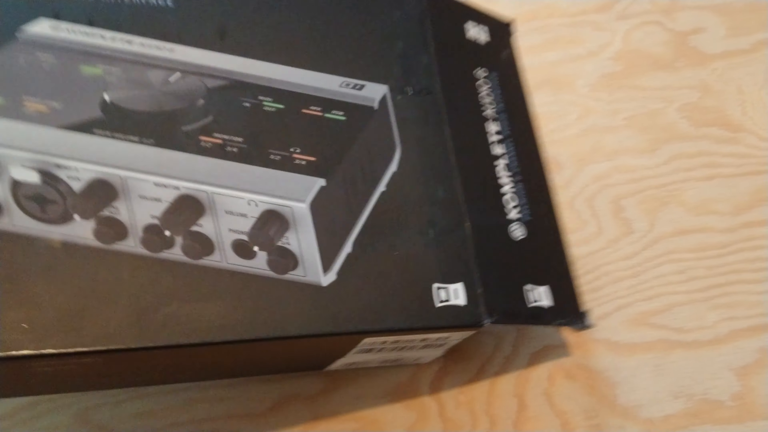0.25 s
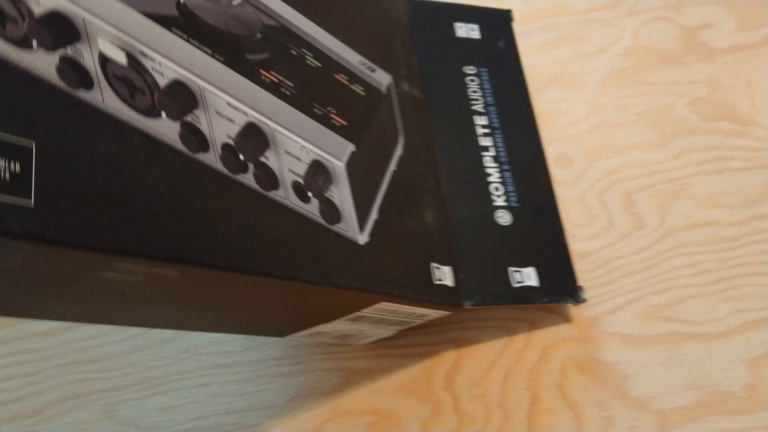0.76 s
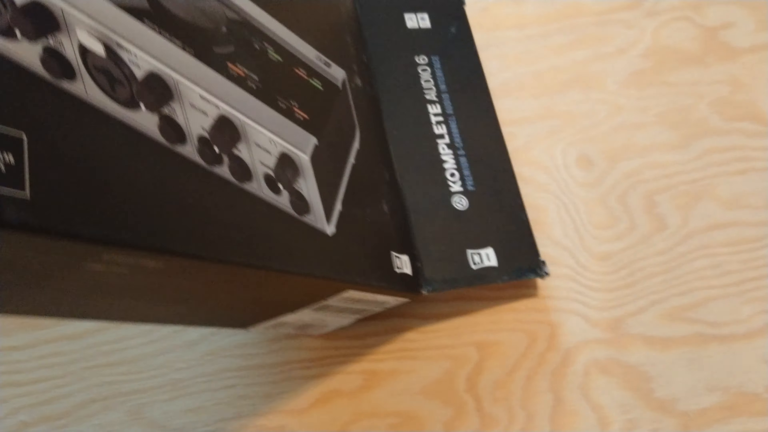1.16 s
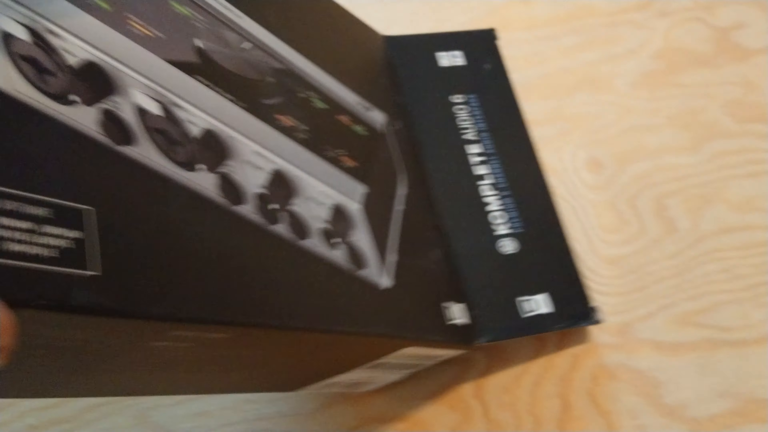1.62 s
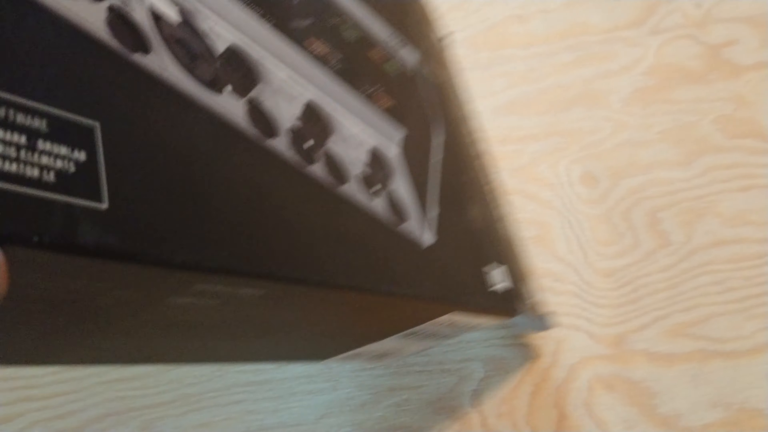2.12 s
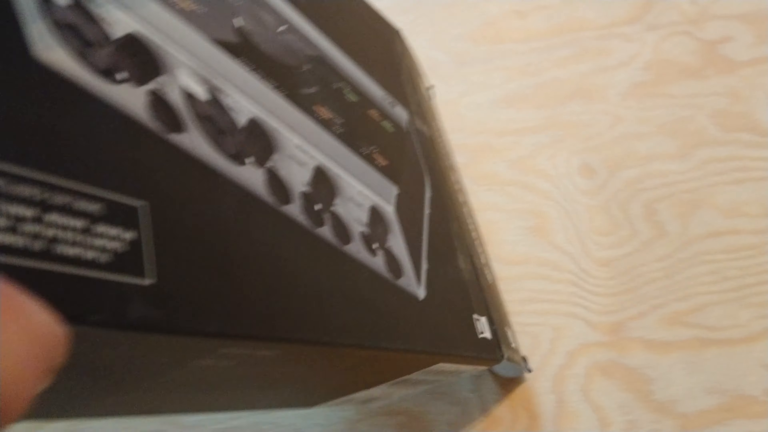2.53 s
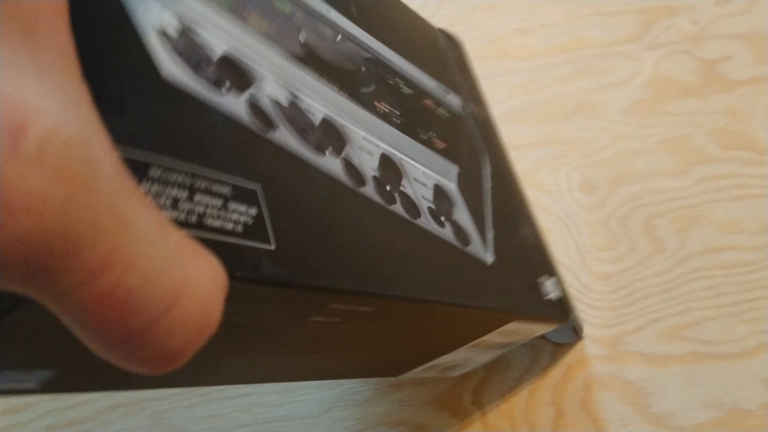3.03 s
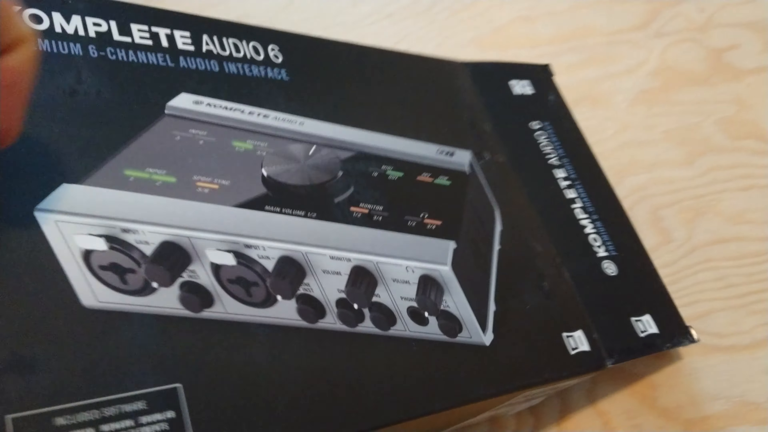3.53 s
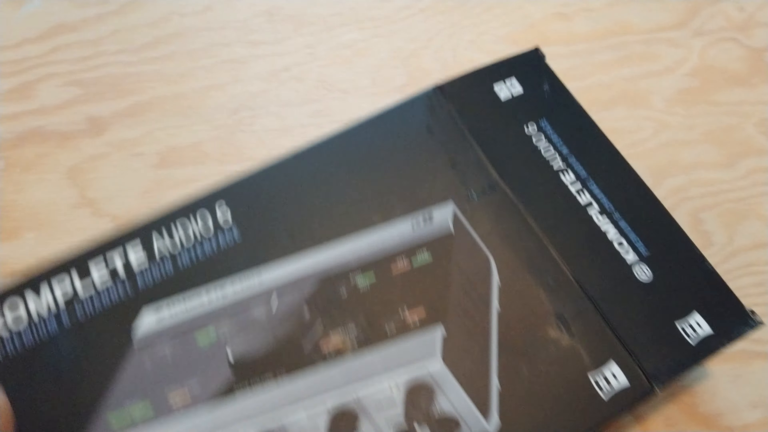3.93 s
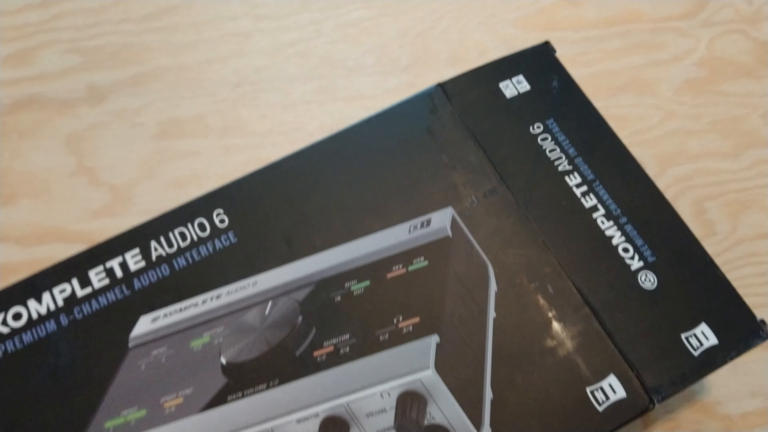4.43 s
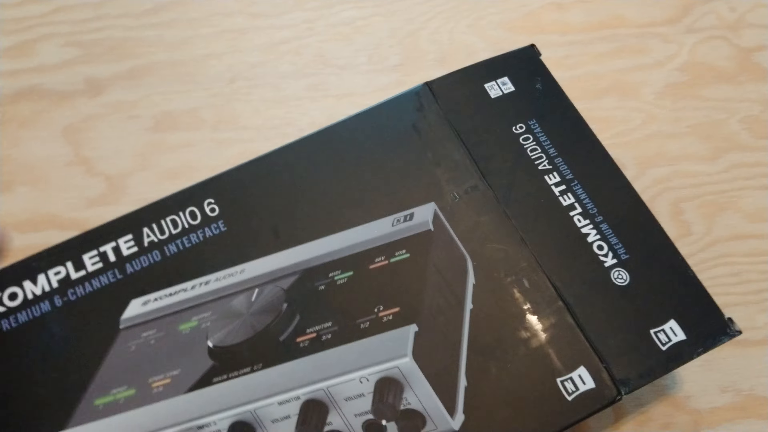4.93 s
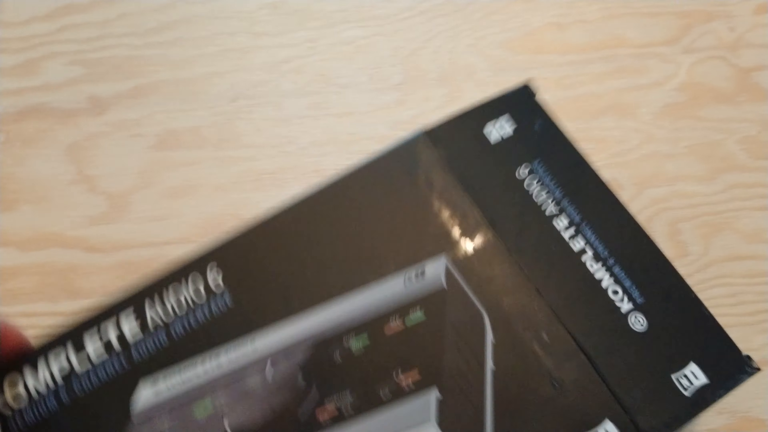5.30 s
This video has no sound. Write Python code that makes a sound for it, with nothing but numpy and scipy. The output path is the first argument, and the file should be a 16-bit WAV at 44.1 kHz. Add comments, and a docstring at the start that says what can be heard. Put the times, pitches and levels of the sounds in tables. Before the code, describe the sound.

A close recording of a cardboard box handled on a table in a small, short-sounding quiet room with faint steady noise. From about 0.1 s a tray scrapes inside its sleeve, hollow and raspy, with dense snapping catches around 0.3-0.4 s. Weaker rubs and a bright crack follow at 0.6-0.7 s, then another crackly cluster at 0.85-1.0 s. Short scrapes continue, with box bumps near 1.2 and 1.75 s and a strong drag until about 2 s. It then falls nearly silent, with only small rubs around 2.3-2.5 s and faint ticks. Scraping and snapping return at 3.0-3.2 s and 3.35-3.6 s. A light, smooth card-on-card slide swells near 3.8 s, a hollow knock lands at 4.0 s, and soft hisses and small bumps continue to 4.9 s. A brisker rub rises at 5.3 s into the loudest, hollow, woody thump at 5.4 s, followed by small rebounds and a papery trailing rustle.

```python
"""Close to the microphone, a tray scrapes out of a cardboard sleeve in jerks, its edges catching and snapping;
then a hand slides over the card with a smooth hiss, and the box bumps a few times, hardest near the end. The
place is a table in a small quiet room with a faint steady noise. Rubbing is noise shaped by tiny slips and by
the resonances of hollow, panels and fibres; catches are runs of tears, snaps are clicks, bumps are damped
modes."""
import sys
import numpy as np
from scipy import signal
from scipy.fft import rfft, irfft, next_fast_len
from scipy.io import wavfile
from scipy.ndimage import uniform_filter1d, map_coordinates

SR = 44100
rng = np.random.default_rng(int(sys.argv[2]) if len(sys.argv) > 2 else 0)


def wrap_up_sound(samples):
    """Save the sound to the file named by the first command line argument, as 16-bit audio."""
    columns = np.atleast_2d(samples).T
    # keep every value between -1 and 1, then stretch to whole-number steps
    tamed = np.clip(columns, -1, 1)
    steps = np.round(tamed * 32767).astype(np.int16)
    wavfile.write(sys.argv[1], SR, steps)


N = 245195

# Level columns are relative: the functions that use them may add a common offset.
# Half-widths are taken where a resonance has fallen by 6 dB.

# Steady noise of the room: [f/Hz, density/dB per Hz]
AIR_SPECTRUM = [(25, -19), (45, -22.5), (70, 1.5), (108, -0.5), (170, -1), (249, -7), (363, -14.5),
                (863, -10.5), (1840, -15.5), (2910, -16.5), (6920, -29.5), (7710, -27), (16000, -32)]
# Dying away of the room: [f/Hz, t60/s]
ROOM_DECAY = [(150, 0.42), (500, 0.16), (2000, 0.25), (6000, 0.17), (15000, 0.14)]
# Two microphone ports, before each side's weight: [f/Hz, likeness 0-1, left lead/rad, left minus right/dB]
PORTS = [(90, 0.34, 0.84, -11), (396, 0.74, 0, -1.5), (664, 0.99, 1.36, -5.5), (1200, 0.2, 1.77, -11.5),
         (2110, 0, 3, -17), (2940, 0, 6, -5.5), (7200, 0, 6, -14), (14300, 0, -4.5, -15.5)]
# Slow change of balance between left and right, for the box and its room answer: [t/s, left minus right/dB]
SWAY = [(.15, -0.5), (.45, 0), (.6, 0.5), (1.05, 1), (1.5, 0), (2.0, 1), (2.4, -1), (2.96, 0), (3.15, 1),
        (3.45, 1), (3.75, -0.5), (4.4, 1), (4.88, 1), (5.1, -1.5), (5.4, 1)]
# Hands shifting their grip and flexing the box: [t/s, half length/s, rumble level/dB]
GRIPS = [(0.398, .02, -54.5), (0.666, 0.04, -55), (1.94, 0.018, -48.5), (2.73, 0.016, -56.5),
         (3.09, 0.051, -53.5), (3.535, 0.059, -53), (4.02, 0.021, -57.5), (4.545, 0.031, -60.5),
         (4.776, .025, -66.5), (5.488, 0.03, -54.5)]

# Air and broad walls of the box: [f/Hz, half-width/Hz, level/dB]
HOLLOW = [(227, 11, -7.5), (292.6, 68, -6.5), (389.5, 43, 2), (495, 68, -1), (608, 12, 0), (774, 41, -14.5)]
# Bending of the stiff panels: [f/Hz, half-width/Hz, level/dB]
PANELS = [(840, 270, -1), (955, 120, 0), (1244, 128, 7), (1460, 150, 1.5), (1680, 120, 2), (1806, 118, 2),
          (2160, 218, 1), (2300, 120, -17.5)]
# Hollow under a light glide: [f/Hz, half-width/Hz, level/dB]
MURMUR = [(242, 48, -6), (422, 81, 0), (470, 67, 4), (606, 136, -1), (805, 250, -19.5)]
# Finest hiss: [f/Hz, half-width/Hz, level/dB]
SHEEN = [(7750, 2200, 12), (12840, 1000, 15.5), (14890, 630, 11)]
# Paper fibres torn across: [f/Hz, density/dB per Hz]
TORN_FIBRES = [(1500, -17), (2350, -15), (2800, 0.5), (3450, 0), (4000, 5), (4900, -0.5), (5550, 0),
               (6150, -8), (6880, -1.5), (7850, -17.5), (8600, -4.5), (9900, -19), (12800, -18),
               (16000, -19)]
# Paper fibres brushed along: [f/Hz, density/dB per Hz]
BRUSHED_FIBRES = [(1500, -4), (2400, 3.5), (3200, -4), (4500, 2), (5300, -0.5), (6100, -2.5), (6900, 1.5),
                  (7800, -15.5), (8800, -6.5), (10500, -18), (12800, -15), (14500, -24), (16000, -11.5)]
# Glossy coating: [f/Hz, density/dB per Hz]
COATING = [(5000, 0), (8700, 1.5), (11000, -10.5), (15500, -2)]
# Other walls, which join in every bump: [f/Hz, level/dB, t60/s]
WALLS = [(310, -28.5, 0.026), (402, -29, 0.22), (511, -13, 0.031), (645, -9, 0.019), (1310, -34, 0.0087),
         (1338, -30, 0.01)]
# Base rocking on the table: [f/Hz, level/dB, t60/s]
BASE = [(95, -11, 0.025), (148, 17, 0.067), (169.5, -6.5, 0.48)]

# Light passes of a hand over the card: [t at full speed/s, hold/s, attack/s, release/s, level/dB, fade over the
# hold/dB, hollow relative level/dB, fibre relative level/dB, sheen relative level/dB]
PASSES = [(3.72, 0.054, 0.62, 0.064, -50.5, -3, -2, -7, -10),
          (3.806, 0.018, 0.02, 0.074, -41, 5.5, -0.5, -1, -8),
          (3.93, 0.098, 0.77, 0.014, -60.5, -7, -5.5, 4.5, -1),
          (4.11, 0.12, 0.17, 0.031, -58.5, 0.5, -0.5, -2, -7),
          (4.31, 0.086, 0.16, 0.08, -54.5, 2.5, 6, -0.5, -3.5),
          (4.445, 0.015, 0.043, 0.009, -53, 0.5, -5, 1.5, -7),
          (4.45, 0.081, 0.57, 0.12, -64, 4.5, -8, 6.5, 11.5),
          (4.54, 0.11, 0.063, 0.16, -60.5, 0.5, 3, 1.5, -1.5),
          (4.76, 0.047, 0.089, 0.042, -57.5, 0, 12, 7.5, 4.5),
          (4.86, 0.089, 0.33, 0.072, -70.5, 2, 8.5, 12, 19.5),
          (5.08, 0.22, 0.19, .08, -61, -9, -0.5, 1.5, -8.5),
          (5.27, 0.13, 0.11, 0.078, -45.5, 7, 1.5, 2, -1.5),
          (5.492, 0.019, 0.034, 0.027, -52.5, 3.5, 2.5, 1.5, 0),
          (5.548, .02, 0.024, .05, -58, -3, 3, -1, -7)]
# The coating cracks at a fold: [t/s, level/dB]
CRACKS = [(0.623, -33), (0.6849, -24), (2.317, -53), (3.04, -37), (3.099, -29.5), (3.155, -48),
          (3.803, -45), (4.15, -47)]
# The box bumps as a whole: [t/s, level/dB, struck wall f/Hz, its t60/s,
# base relative level/dB, crack relative level/dB]
BUMPS = [(0.399, -32.5, 417, 0.012, -0.5, -27), (1.175, -24.5, 512, 0.041, -42, -8),
         (1.7495, -21.5, 497.6, 0.15, -34, -1), (2.384, -47.5, 416, 0.025, -5.5, -17),
         (3.374, -30, 415, 0.011, -11, -8), (4.0121, -23.5, 419, 0.021, -11.5, -9.5),
         (4.151, -33, 410, 0.015, -11, -17), (4.621, -30.5, 460, 0.012, -15, -15),
         (4.79, -39, 443, 0.094, -20, -26), (5.366, -31, 696, 0.014, -12, -2),
         (5.398, -19.5, 437, 0.054, -6, -5), (5.4025, -6.5, 459, 0.026, -10, -7.5),
         (5.4455, -29, 460, 0.041, -16, -17)]
# One wall takes up the rubbing for a moment: [t/s, half length/s, f/Hz, level/dB]
GROANS = [(0.338, 0.038, 635, -31.5), (0.365, 0.024, 294, -36.5), (0.877, 0.022, 430, -36.5),
          (1.77, 0.031, 474, -39), (2.427, 0.013, 5100, -58), (3.429, 0.013, 2090, -42),
          (3.431, 0.013, 5200, -54), (4.336, 0.028, 2350, -53), (4.57, 0.028, 1770, -57),
          (4.795, 0.0082, 441, -38.5), (5.28, .045, 610, -46.5)]
# An edge catches and lets go: [t/s, hollow level/dB, panel level/dB, fibre level/dB,
# plucked panel f/Hz, t60 of the tears/s]
CATCHES = [(0.169, -43.5, -56, -51.5, 1240, .025), (0.278, -31, -40.5, -46, 1370, 0.014),
           (0.293, -35, -34, -42, 1900, 0.047), (0.306, -33, -33, -38, 1890, 0.013),
           (0.3295, -42, -29.5, -36, 1890, 0.085), (0.347, -26.5, -40, -40, 915, 0.02),
           (0.366, -32, -35.5, -44, 1910, 0.012), (0.399, -38, -36.5, -43, 1010, 0.082),
           (0.413, -43, -48, -45.5, 1120, 0.0082), (0.53, -35, -45, -51, 1200, 0.2),
           (0.624, -35.5, -41.5, -48, 1180, 0.031), (0.6828, -41, -33.5, -44, 1540, 0.0085),
           (0.716, -44, -51, -60, 1200, .02), (0.8431, -64, -32, -37.5, 1590, 0.0079),
           (0.862, -39, -38, -39.5, 1320, 0.03), (0.876, -40, -44, -49, 1100, 0.016),
           (0.892, -38, -32, -44, 1440, 0.03), (0.899, -33, -38, -52, 1270, 0.026),
           (0.924, -40, -37, -48, 1740, .014), (0.928, -31, -35, -50, 1390, 0.035),
           (0.946, -34, -33, -35.5, 1600, 0.043), (0.955, -30.5, -39, -54, 1250, 0.016),
           (0.9762, -46, -31.5, -34, 1450, 0.051), (1.001, -52, -50, -37.5, 1500, 0.032),
           (1.031, -71, -50, -50, 1390, 0.017), (1.133, -46.5, -56, -57, 1100, 0.032),
           (1.175, -43, -35, -41.5, 1510, 0.0355), (1.212, -65, -35.5, -65, 1300, 0.046),
           (1.229, -48, -38.5, -47, 1270, 0.044), (1.267, -43, -48, -49, 1180, 0.028),
           (1.362, -73, -38, -40.5, 1500, 0.078), (1.573, -52, -42.5, -59, 1230, .035),
           (1.587, -49, -40, -58, 1460, 0.014), (1.6, -38, -39, -48.5, 1200, 0.016),
           (1.615, -56, -43, -47, 1390, .015), (1.7498, -62, -32, -49, 1360, 0.045),
           (1.794, -44, -34.5, -38, 1390, 0.04), (1.8814, -34.5, -36.5, -59, 1380, 0.02),
           (1.895, -36, -40.5, -63, 1400, 0.013), (1.917, -35.5, -34, -55, 1430, 0.032),
           (1.931, -38, -49, -49, 1660, 0.015), (1.98, -59, -53.5, -55, 1500, 0.01),
           (2.325, -56, -54, -67, 1170, 0.054), (2.343, -61, -59.5, -70, 900, 0.016),
           (2.4155, -70, -61, -52.5, 1880, .015), (2.498, -60, -58, -82, 754, 0.031),
           (2.683, -54.5, -57, -72, 1390, 0.029), (2.713, -55, -56, -61, 1260, 0.021),
           (2.749, -52, -50, -78, 847, 0.024), (2.792, -60, -58, -75, 770, 0.034),
           (2.961, -47.5, -43, -62.5, 1200, 0.052), (2.9926, -39, -46.5, -57, 923, 0.024),
           (3.034, -45, -47, -69, 1500, .015), (3.04, -34, -37, -49, 855, 0.025),
           (3.051, -48, -40.5, -64, 1120, 0.02), (3.0808, -41, -38.5, -54, 1280, 0.073),
           (3.0947, -36, -32.5, -47, 910, 0.02), (3.103, -58, -39.5, -37.5, 1620, 0.052),
           (3.155, -39, -35.5, -43.5, 1350, 0.037), (3.349, -54, -41.5, -52, 1910, 0.027),
           (3.3615, -43, -44, -52, 1120, 0.0097), (3.368, -40, -46, -54, 945, 0.017),
           (3.407, -44.5, -36, -61, 1520, 0.022), (3.417, -46, -43, -65, 1850, 0.012),
           (3.423, -43, -38, -66, 1550, 0.017), (3.438, -44, -46, -58, 1900, 0.017),
           (3.444, -37, -34, -51, 1880, 0.018), (3.47, -46, -41.5, -58, 1410, 0.014),
           (3.483, -41.5, -40.5, -65, 1090, 0.013), (3.492, -40, -45, -72, 1340, 0.0072),
           (3.505, -44, -42, -49.5, 1310, 0.012), (3.55, -48, -45.5, -72, 790, 0.0071),
           (3.564, -40.5, -52, -65, 1160, 0.02), (3.584, -39, -44, -67, 830, 0.018),
           (3.803, -41.5, -51, -42, 1210, 0.026), (4.149, -37, -44, -53, 860, 0.018),
           (4.158, -46, -51, -53, 1320, 0.015), (4.583, -53, -52, -58.5, 1980, 0.02),
           (4.876, -51.5, -63, -66, 900, .02), (5.001, -60, -58, -78, 1780, 0.01),
           (5.133, -67, -52.5, -61, 1300, 0.017), (5.3991, -41, -32.5, -36.5, 1920, 0.0094),
           (5.405, -42, -30, -38.5, 920, 0.0059), (5.4448, -33.5, -41, -59, 1090, 0.016),
           (5.48, -45, -50, -59, 1490, 0.016), (5.515, -48, -53.5, -73, 1190, 0.018)]
# Pulls of the tray in its sleeve: [t at full speed/s, hold/s, attack/s, release/s, level/dB,
# fade over the hold/dB, hollow relative level/dB, fibre relative level/dB, spread of slip sizes/dB,
# sheen over the fibres/dB, panel pitch/semitones]
PULLS = [(.185, 0.13, 0.065, 0.083, -38, 4.5, 2.5, -13, 2.5, 0.5, -2.5),
         (.3, 0.034, 0.12, 0.13, -35, 0.5, 13.5, -6, 5, -5, -1.95),
         (.535, 0.04, 0.025, 0.21, -47, 5, 1, -11.5, 3, -7, 0.62),
         (.668, 0.044, 0.048, 0.13, -42.5, 2, 10, -2.5, -1.5, -4.5, -2.7),
         (.78, 0.034, 0.049, 0.036, -47, 2, 7, -9, 2, -6, -1.3),
         (.85, 0.16, 0.016, 0.14, -46, -5.5, 2, -4, 2, -9, 2.1),
         (1.215, 0.032, 0.06, 0.066, -42.5, 3, 2, -0.5, 2, -22, -0.82),
         (1.372, 0.081, 0.052, 0.057, -43.5, 1.5, -13, -3, 0.5, -13, 1.6),
         (1.525, 0.023, 0.39, 0.05, -48.5, 1, 6, -8, -3, -11, -0.57),
         (1.585, 0.034, 0.058, 0.059, -40, 4.5, 4.5, -5, 1, -17, 0.27),
         (1.7, 0.022, 0.029, .04, -45.5, -1, 7.5, -7.5, 4, -7, -1.4),
         (1.765, 0.2, 0.052, 0.035, -38, 4, 1, -6, -3, -15, -0.44),
         (2.02, 0.029, .03, 0.086, -64.5, 9, 4, -6, -2, -14, 1.8),
         (2.2, 0.05, 0.02, .02, -73.5, 8.5, -2, -16, 6, -15.5, 0.85),
         (2.327, 0.02, 0.0027, 0.067, -52.5, 4, -19, -3, -0.5, -6, 0.96),
         (2.414, 0.065, 0.025, 0.075, -50, 11.5, -4.5, -1.5, 0.5, -3.5, 1.1),
         (2.59, 0.012, 0.029, 0.025, -69.5, 3.5, -2, -9, -1.5, -13, -0.31),
         (2.71, 0.11, 0.075, 0.056, -60, 8, 1.5, -8, 2, -13, -2.7),
         (3.04, 0.18, 0.1, 0.062, -51.5, 2.5, 3.5, -11, 13, -1, 0.89),
         (3.21, 0.15, 0.16, 0.052, -51.5, -3, -4.5, -6.5, -1, -6.5, -0.67),
         (3.355, 0.021, 0.04, 0.062, -41.5, 4, 8.5, -9.5, 7, -10, -0.029),
         (3.415, 0.028, 0.0092, 0.039, -45.5, 2, 3.5, -8, 7, -14, 1.9),
         (3.48, 0.11, 0.052, 0.049, -51, -3, 7.5, -11.5, 3.5, -27, 0.012)]

REBOUND_S, SHRINK = 0.039, 0.53  # first rebound after a bump, each flight over the one before
REBOUND_DB, LOSS_DB = -22.5, 13  # first rebound, loss for each further one
REBOUND_T60_S, REBOUND_CRACK_DB = 0.035, -19
CLUMP_RATE_HZ, CLUMP_LIFE_S, CLUMP_SPREAD_DB, CLUMP_STEADY = 110, 0.004, 4, 0.5
SNAP_CYCLES = 5.5  # cycles in which a snap loses 60 dB
TOP_HZ = 16100


def amp(db):
    """Decibels to gain."""
    return 10 ** (np.asarray(db) / 20)


def unit(x):
    """Scaled to rms 1."""
    return x / np.sqrt(np.mean(x ** 2) + 1e-20)


def along(points, hz, axis=1):
    """One column of a table by frequency, read on a log axis."""
    cols = np.transpose(points)
    return np.interp(np.log(hz + 1), np.log(cols[0] + 1), cols[axis])


def curves(rows):
    """One value per sample for each column after the time."""
    s, *cols = np.transpose(rows)
    return [np.interp(np.arange(N) / SR, s, c) for c in cols]


def filtered(x, response):
    """The signal shaped by a complex response of frequency, padded against wrap-around."""
    n = x.shape[-1]
    padded = 2 * next_fast_len(n)
    spectrum = rfft(x, padded) * response(np.fft.rfftfreq(padded, 1 / SR))
    return irfft(spectrum, padded)[..., :n]


def causal(gain):
    """The minimum-phase response with this gain, which rings only after a blow."""
    cepstrum = irfft(np.log(np.maximum(gain, 1e-6)))
    half = len(cepstrum) // 2
    return np.exp(rfft(np.r_[cepstrum[0], 2 * cepstrum[1:half], np.zeros(half)]))


def resonant(modes):
    """Response of a set of broad resonances with steep skirts."""
    def peak(hz, centre, width, db):
        detuning = (hz * hz - centre * centre) / (2 * width * hz + 1)
        return amp(db) ** 2 / (1 + detuning ** 2) ** 2
    return lambda hz: causal(np.sqrt(sum(peak(hz, *mode) for mode in modes)))


def coloured(spectrum):
    """Response of a smooth spectrum, rolled off below its first point."""
    return lambda hz: causal(amp(along(spectrum, hz)) * np.minimum(hz / spectrum[0][0], 1) ** 2)


def dying(t, t60):
    """A decay that loses 60 dB in t60."""
    return np.exp(-np.log(1000) * t / max(t60, 1e-4))


def add(track, s, sound):
    """Mix a sound in at time s."""
    part = track[:, max(round(s * SR), 0):][:, :sound.shape[-1]]
    part += sound[..., :part.shape[1]]


def drift(rate):
    """A smooth random curve, rate knots a second."""
    return map_coordinates(rng.standard_normal(200), [np.arange(N) * rate / SR], mode="wrap")


def strokes(rows):
    """Strokes swell 20 dB in the attack, fade, lose 20 dB in the release; colours are weighted by power."""
    t = np.arange(0, N, SR // 1000) / SR
    s, hold, attack, release, db, fade_db, *colours = np.transpose(rows)[..., None]
    before = np.maximum(s - t, 0) / np.abs(attack)
    after = np.maximum(t - s - hold, 0) / np.abs(release)
    fade = fade_db * np.clip((t - s) / hold, 0, 1)
    power = amp(db - 20 * (before + after) - fade) ** 2 + 1e-14
    total = power.sum(axis=0)
    mixed = [(power * c).sum(axis=0) / total for c in colours]
    return curves(np.transpose([t, 10 * np.log10(total), *mixed]))


def slips(spread_db, rate, life, steady):
    """Stick-slip force: random tiny releases of uneven size over a steady drag, local mean power near 1."""
    release = rng.random(N) < rate / SR
    size = release * amp(spread_db * np.clip(rng.standard_normal(N), -2, 2))
    power = signal.lfilter([1], [1, -np.exp(-1 / (life * SR))], size ** 2)
    power = power / (np.abs(uniform_filter1d(power, size=2200)) + 1e-6)  # evened over 50 ms
    return np.sqrt((np.abs(power) + abs(steady)) / (1 + abs(steady)))


def rubbed(force, response, level_db):
    """Friction noise under a slip force, ringing in one part of the box."""
    def balanced(hz):
        gain = response(hz)
        return gain / np.sqrt(np.mean(np.abs(gain) ** 2))
    noise = unit(force * rng.standard_normal((2, N)))
    return filtered(noise * amp(level_db), balanced)


def wandering(x, depth_db):
    """As the contact moves, it favours ever different modes of the card."""
    z = signal.stft(x, nperseg=512)[2]
    field = uniform_filter1d(rng.standard_normal(z.shape[1:]), size=3, axis=0)
    field = uniform_filter1d(field, size=18, axis=1)  # about 0.1 s
    return signal.istft(z * unit(amp(depth_db * unit(field))), nperseg=512)[1][:, :N]


def flexing(force, level_db, semitones, reach=2.4):
    """The panels ring higher or lower as the grip tightens and slackens, within reach semitones."""
    place = np.clip(semitones / reach, -1, 1)
    sound = 0
    for step in (-1, 0, 1):  # crossfade lowered, resting and raised panels
        share = np.maximum(1 - np.abs(place - step), 1e-6)
        modes = [(hz * 2 ** (step * reach / 12), width, db) for hz, width, db in PANELS]
        sound = sound + rubbed(force, resonant(modes), level_db + 10 * np.log10(share))
    return sound


def ringing(modes, t, swell):
    """Damped modes under a soft push, peak 1."""
    ring = sum(amp(db + rng.normal(0, 1)) * np.sin(2 * np.pi * hz * t) * dying(t, t60)
               for hz, db, t60 in modes)
    ring = ring * (1 - np.exp(-(t / swell) ** 2))
    return ring / np.abs(ring).max()


def room_noise():
    """Steady noise with the spectrum of the quiet room, rms 1."""
    return unit(filtered(rng.standard_normal((2, N)), coloured(AIR_SPECTRUM)))


def room(x):
    """A short diffuse answer of the walls, each frequency dying at its own speed."""
    hz, t, z = signal.stft(rng.standard_normal((2, SR // 2)), SR, nperseg=256)
    decay = np.exp(-np.log(1000) * t / along(ROOM_DECAY, hz)[:, None])
    tail = signal.istft(z * decay, SR, nperseg=256)[1]
    late = np.pad(x, ((0, 0), (SR // 200, 0)))  # 5 ms behind the box
    return signal.fftconvolve(late, tail / np.linalg.norm(tail[0]), axes=1)[:, :N]


def table(x, count=8, farthest_s=0.006, echo_db=-9):
    """Table top and box walls throw back early copies, whose comb changes every quarter second."""
    early, hop = np.zeros((2, N)), SR // 4
    for i in range(0, N - hop, hop):
        echoes = np.zeros((2, SR // 40))
        for row in echoes:
            delays = np.minimum(rng.uniform(0.001, farthest_s, count), 0.02)
            row[(delays * SR).astype(int)] = rng.choice([-1, 1], count)
        part = x[:, i:i + 2 * hop]
        fade = np.sin(np.pi * np.arange(part.shape[1]) / (2 * hop))
        add(early, i / SR, signal.fftconvolve(part * fade, echoes / np.sqrt(count), axes=1))
    return x + amp(echo_db) * signal.lfilter(*signal.butter(2, 800, "high", fs=SR), early)


def ports(pair):
    """A shared and an unshared signal become left and right, mixed, delayed and weighted by frequency."""
    def ear(weight):
        def response(hz):
            turn = np.arccos(np.clip(along(PORTS, hz, axis=1), 0, 1)) / 2
            lead = np.exp(weight * 0.5j * along(PORTS, hz, axis=2))
            place = amp(weight * along(PORTS, hz, axis=3) / 2) * lead
            return place * np.array([np.cos(turn), weight * np.sin(turn)])
        return filtered(pair, response).sum(axis=0)
    return np.array([ear(0.99), ear(-0.41)])


def hands():
    """A faint low rumble while the grip shifts."""
    t = np.arange(N) / SR
    flex = sum(amp(db) / (1 + ((t - s) / half) ** 2) for s, half, db in GRIPS)
    force = slips(2.2, rate=65, life=0.021, steady=0.37)
    return rubbed(force, resonant([(81, 11, -6.5), (154.7, 100, 7.0)]), 20 * np.log10(flex))


def glide(hollow_db=0.5, fibre_db=-0.46, waver_semitones=1.7):
    """A hand slides lightly over the card in dense, even slips: a bright hiss over a soft hollow murmur."""
    level, hollow, fibre, sheen = strokes(PASSES)
    force = slips(0.83, rate=1500, life=0.0023, steady=0.53)
    murmur = rubbed(force, resonant(MURMUR), level + hollow + hollow_db)
    panels = flexing(force, level, waver_semitones * drift(rate=6.9))
    hiss = rubbed(force, coloured(BRUSHED_FIBRES), level + fibre + fibre_db)
    finest = rubbed(force, resonant(SHEEN), level + sheen)
    return murmur + wandering(panels, depth_db=5.0) + wandering(hiss, depth_db=0.5) + finest


def cracks(t60=0.014):
    """The glossy coating gives way at a fold in a very short, thin, bright burst."""
    track, t = np.zeros((2, N)), np.arange(SR // 10) / SR
    for s, db in CRACKS:
        burst = unit(filtered(rng.standard_normal((2, len(t))), coloured(COATING)))
        add(track, s, amp(db) * burst * dying(t, t60))
    return track


def contacts(count=3):
    """Every bump, then its rebounds, ever quicker and weaker."""
    for s, db, hz, t60, base_db, crack_db in BUMPS:
        yield s, db, hz, t60, base_db, crack_db
        for k in range(count):
            s = s + REBOUND_S * SHRINK ** k
            yield s, db + REBOUND_DB - LOSS_DB * k, hz, REBOUND_T60_S, base_db, REBOUND_CRACK_DB


def bumps(lowest_hz=66):
    """A push rings one damped wall and rocks the base, with a papery crack at the contact."""
    track, t = np.zeros((2, N)), np.arange(SR // 2) / SR
    short = t[:SR // 10]
    for s, db, hz, t60, base_db, crack_db in contacts():
        wall = ringing([(hz, 0, t60), *WALLS], t, swell=0.0015)
        thud = wall + amp(base_db) * ringing(BASE, t, swell=0.00071)
        add(track[:1], s, amp(db) * thud)  # shared signal only
        burst = rng.standard_normal((2, len(short))) * dying(short, 0.03)
        crack = unit(filtered(burst, resonant(PANELS))) + 0.4 * unit(filtered(burst, coloured(TORN_FIBRES)))
        add(track, s, amp(db + crack_db) * crack / np.abs(crack).max())
    # a small box radiates no deep bass
    return signal.lfilter(*signal.butter(4, lowest_hz, "high", fs=SR), track)


def groans(width_hz=45):
    """Slips feed a single wall mode, which swells and fades as the contact passes over it."""
    track = np.zeros((2, N))
    t = np.arange(-SR // 8, SR // 8) / SR
    for s, half, hz, db in GROANS:
        mode = resonant([(hz, width_hz * np.sqrt(hz / 500), 0)])  # width_hz holds at 500 Hz
        ring = unit(filtered(rng.standard_normal((2, len(t))), mode))
        add(track, s + t[0], amp(db) * ring * np.exp(-(t / half) ** 2 / 2))
    return track


def crackle(rate=330, spread_db=3.5, crackle_db=-7, fibre_db=-1, panel_hz=1450, fibre_hz=4200,
            scatter=0.28, cycles=9):
    """Ridges of the cut edge tick over the sleeve at random, each with its own pitch, louder the harder the pull."""
    level, _, fibre, *_ = strokes(PULLS)
    t = np.arange(SR // 100) / SR

    def ticks(centre_hz, level_db):
        at = np.flatnonzero(rng.random(N) < rate / SR)
        draws = np.clip(rng.standard_normal((N // 40, 3))[:len(at)], -2, 1.5)
        size, pitch, side = draws.T[..., None]
        hz = centre_hz * np.exp(scatter * pitch)
        rings = amp(spread_db * size) * np.sin(2 * np.pi * hz * t) * dying(hz * t, cycles)
        where = (at[:, None] + np.arange(len(t))).ravel()
        pair = np.array([np.bincount(where, part.ravel(), N)[:N] for part in (rings, rings * side)])
        return amp(level_db + crackle_db) * unit(pair)
    return ticks(panel_hz, level) + ticks(fibre_hz, level + fibre + fibre_db)


def snaps(edge_db=-7, edge_ratio=4.1, snap_db=7):
    """As a catch lets go, the fold flips in one motion: a click of a few cycles with a brighter edge."""
    track, t = np.zeros((2, N)), np.arange(SR // 50) / SR
    for s, _, panel, _, hz, _ in CATCHES:
        click = np.sin(2 * np.pi * hz * t) + amp(edge_db) * np.sin(2 * np.pi * edge_ratio * hz * t)
        add(track[:1], s, amp(panel + snap_db) * click * dying(t, SNAP_CYCLES / hz))
    return track


def catches(hollow_db=-12, panel_db=-11, fibre_db=-9.0, pluck_db=-13, pluck_width_hz=200,
            rise_s=0.0003, tear_rate=4000):
    """Each catch is a short run of tiny tears into hollow, panels and fibres; it also plucks one panel."""
    track, t = np.zeros((2, N)), np.arange(SR // 10) / SR
    parts = resonant(HOLLOW), resonant(PANELS), coloured(TORN_FIBRES)
    for s, hollow, panel, fibre, hz, t60 in CATCHES:
        tears = rng.choice([-1, 1], (2, len(t))) * (rng.random(len(t)) < tear_rate / SR)
        burst = tears * dying(t, t60) * (1 - np.exp(-t / rise_s))
        levels = hollow + hollow_db, panel + panel_db, fibre + fibre_db, panel + pluck_db
        pluck = resonant([(hz, pluck_width_hz, 0)])
        for db, part in zip(levels, (*parts, pluck)):
            add(track, s, amp(db) * np.array([unit(side) for side in filtered(burst, part)]))
    return track


def sticking(depth_db=-6, hold_s=0.0027):
    """The tray sticks for a moment before each catch lets go, so the level of the drag dips."""
    t = np.arange(N) / SR
    stuck = np.zeros(N)
    for s, *_ in CATCHES:
        i = round(s * SR)
        span = slice(i - SR // 20, i)
        stuck[span] = np.maximum(stuck[span], np.exp(-((t[span] - s) / hold_s) ** 2))
    return depth_db * stuck


def scrape(hollow_db=-5.0, fibre_db=0.6, waver_semitones=0.49):
    """The tray drags in its sleeve: the same clumps of slips shake the hollow, the panels and the fibres."""
    pull, hollow, fibre, spread, sheen, semitones = strokes(PULLS)
    level = pull + sticking()
    clumps = slips(CLUMP_SPREAD_DB, CLUMP_RATE_HZ, CLUMP_LIFE_S, CLUMP_STEADY)
    force = clumps * slips(spread, rate=430, life=0.0037, steady=0.39)
    fine = np.hypot(force, 0.35)  # fibres also brush between the slips
    body = rubbed(fine, resonant(HOLLOW), level + hollow + hollow_db)
    panels = flexing(force, level, semitones + waver_semitones * drift(rate=13))
    rasp = rubbed(fine, coloured(TORN_FIBRES), level + fibre + fibre_db)
    finest = rubbed(fine, resonant(SHEEN), level + fibre + sheen)
    return (wandering(body, depth_db=2.5) + wandering(panels, depth_db=4.0)
            + wandering(rasp, depth_db=2.0) + finest)


def scene(room_db=-12.5, air_db=-71):
    """The box on its table, close by, in a room with a faint steady noise."""
    handling = hands() + glide() + cracks() + bumps()
    tray = groans() + crackle() + snaps() + catches() + scrape()
    box = table(handling + tray)
    sway = amp(np.outer([1, -1], curves(SWAY)[0]) / 2)
    return sway * ports(box + amp(room_db) * room(box)) + amp(air_db) * ports(room_noise())


def record(dry, low_cut_hz=50):
    """The microphone thins the deepest bass and cuts steeply above its band limit."""
    def response(hz):
        low_cut = hz ** 2 / np.hypot(hz ** 2, low_cut_hz ** 2)
        return low_cut / np.sqrt(1 + (hz / TOP_HZ) ** 200)
    return filtered(dry, response)


dry = scene()
out = record(dry)
wrap_up_sound(out)
```